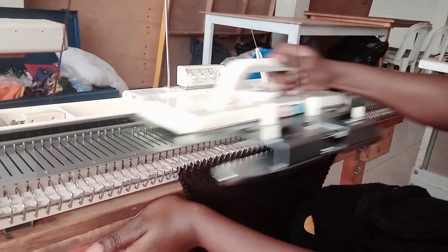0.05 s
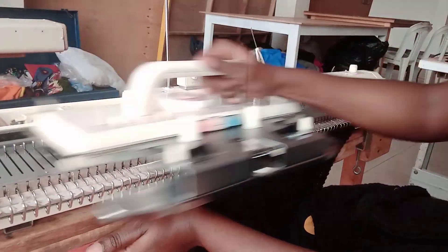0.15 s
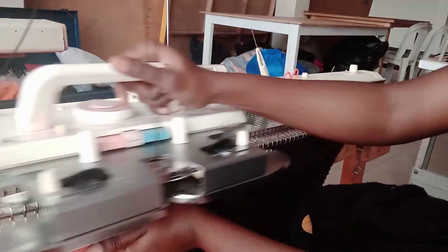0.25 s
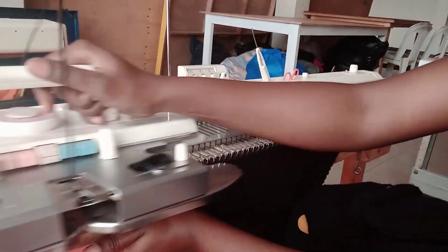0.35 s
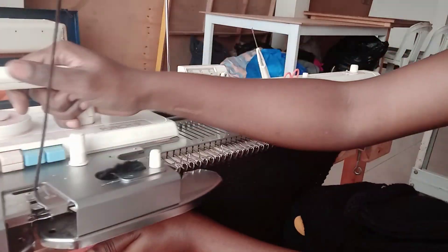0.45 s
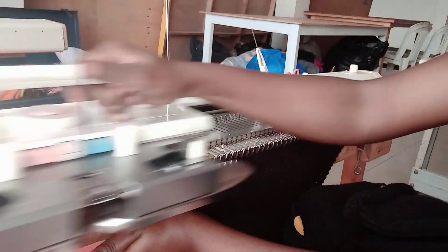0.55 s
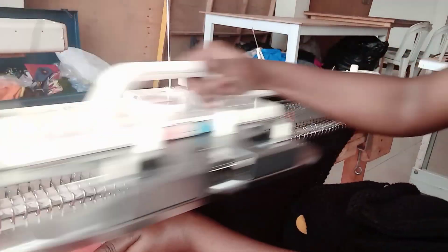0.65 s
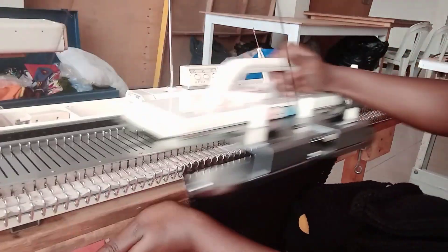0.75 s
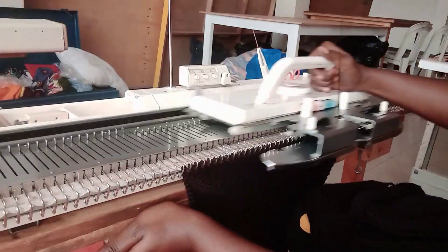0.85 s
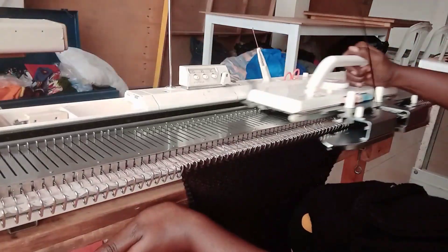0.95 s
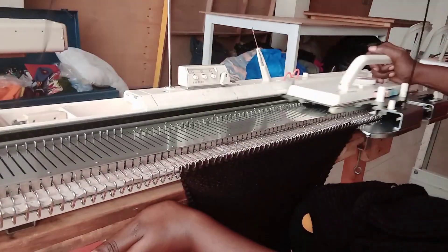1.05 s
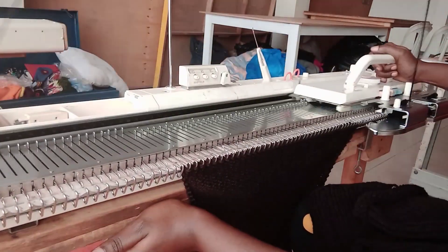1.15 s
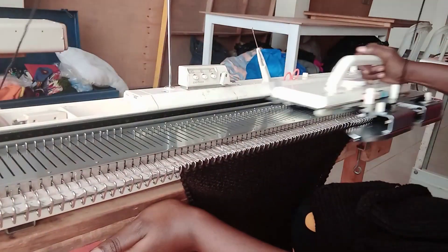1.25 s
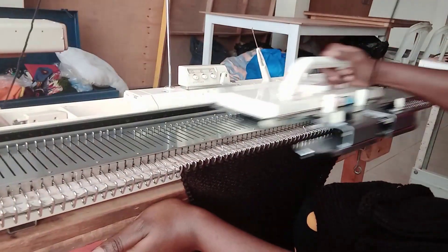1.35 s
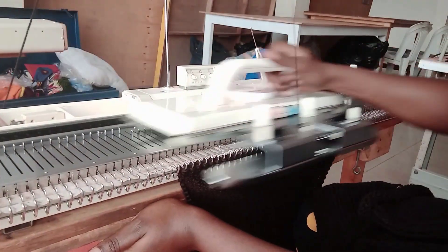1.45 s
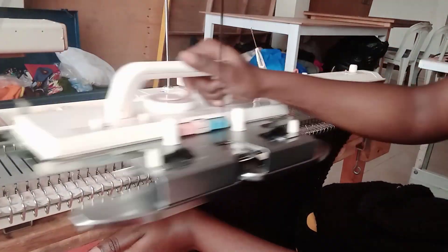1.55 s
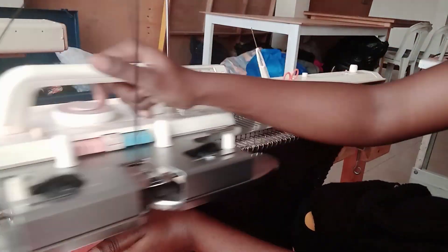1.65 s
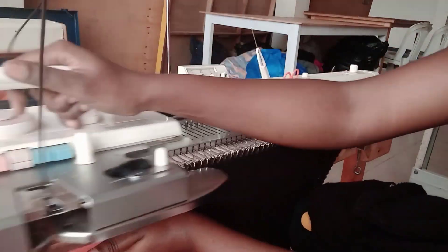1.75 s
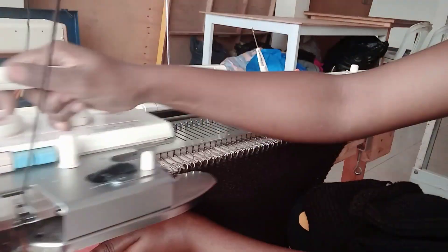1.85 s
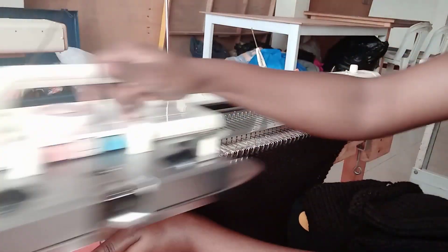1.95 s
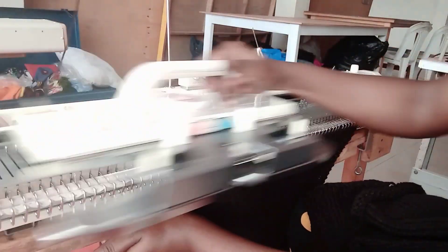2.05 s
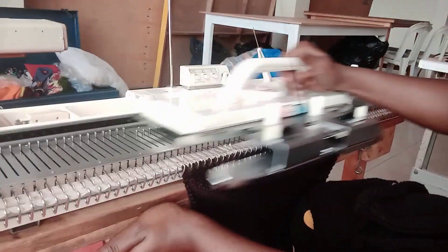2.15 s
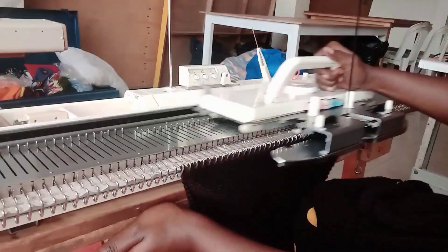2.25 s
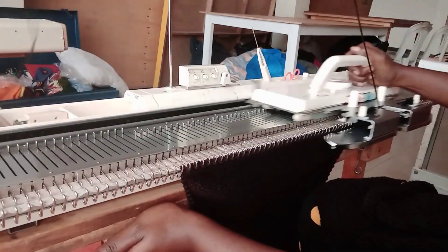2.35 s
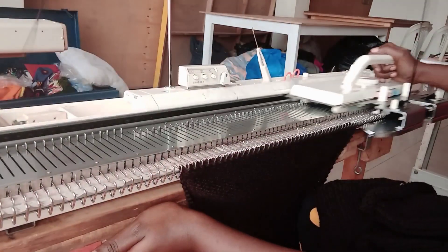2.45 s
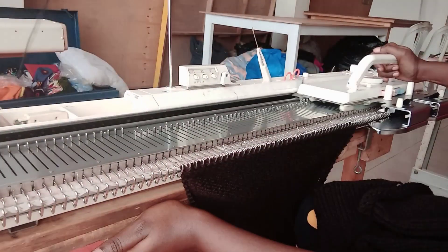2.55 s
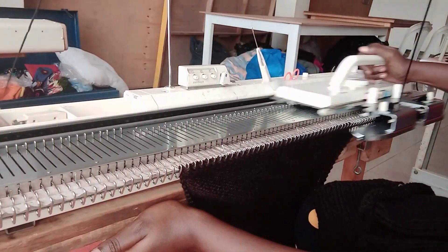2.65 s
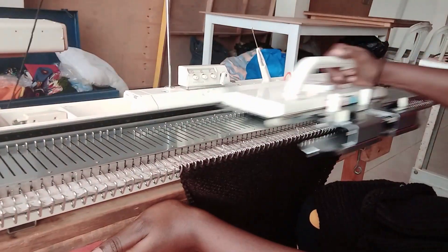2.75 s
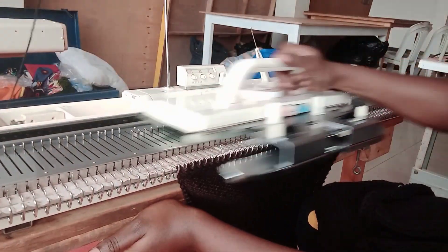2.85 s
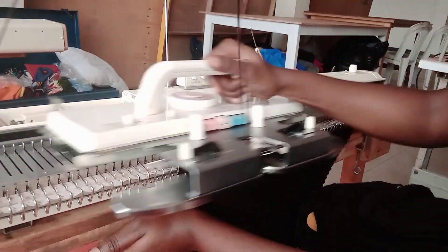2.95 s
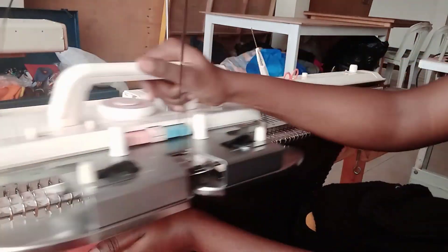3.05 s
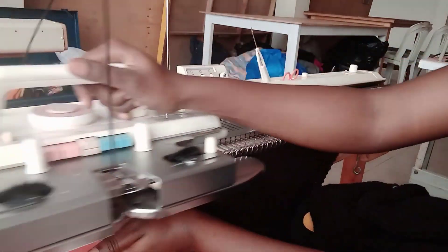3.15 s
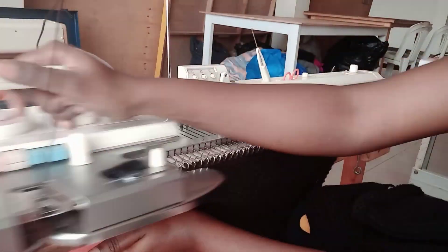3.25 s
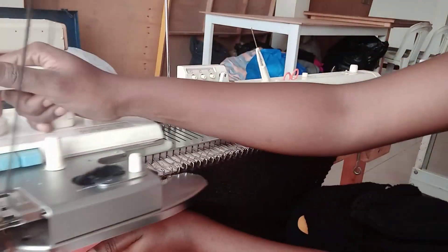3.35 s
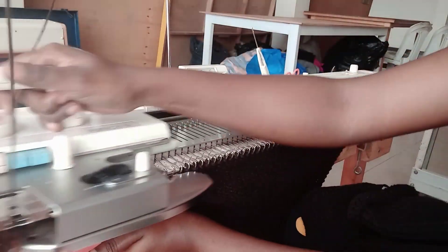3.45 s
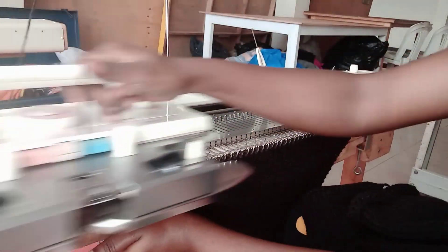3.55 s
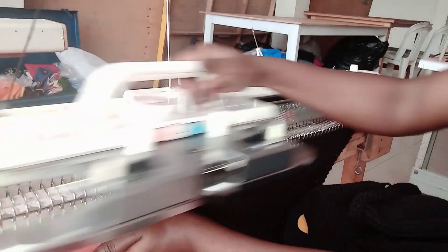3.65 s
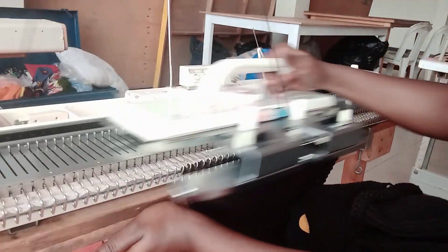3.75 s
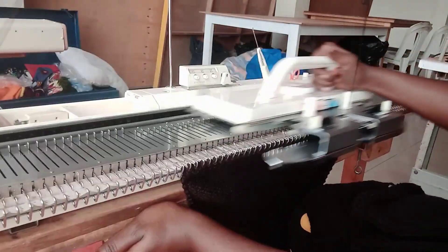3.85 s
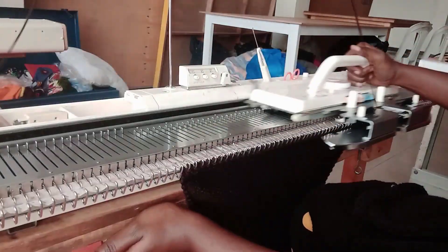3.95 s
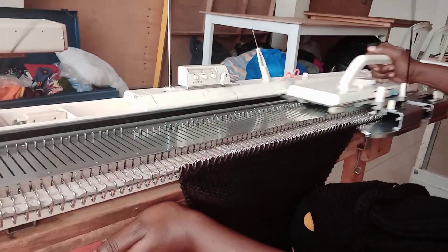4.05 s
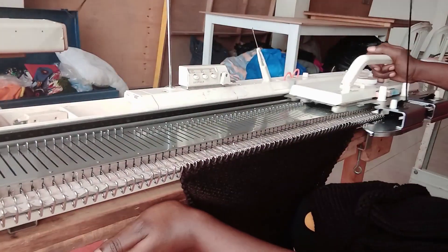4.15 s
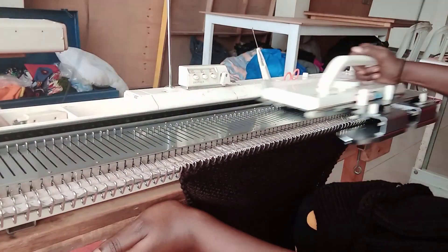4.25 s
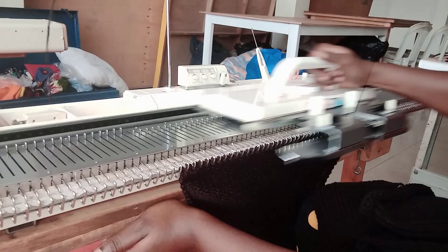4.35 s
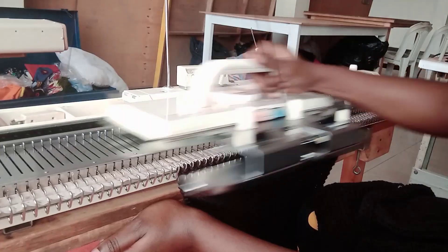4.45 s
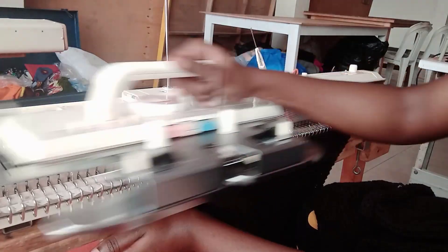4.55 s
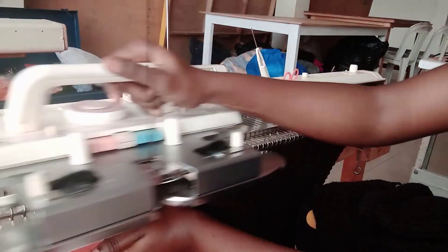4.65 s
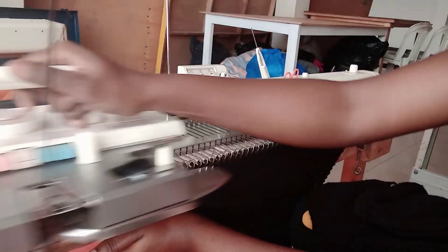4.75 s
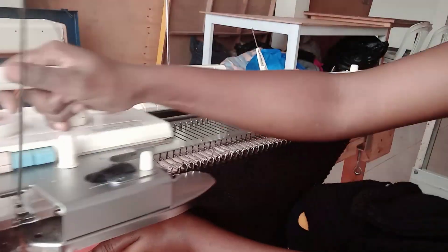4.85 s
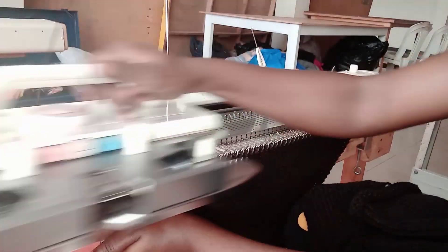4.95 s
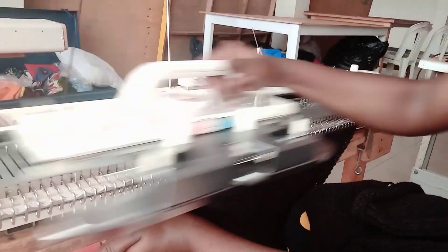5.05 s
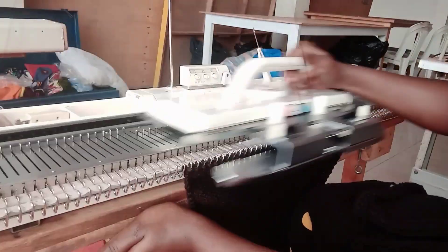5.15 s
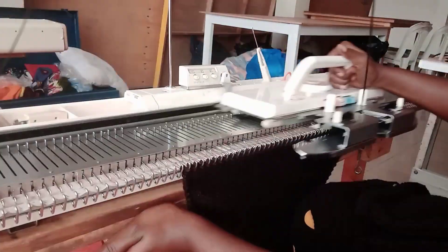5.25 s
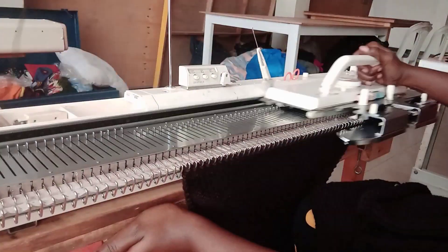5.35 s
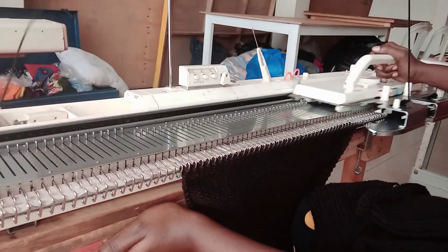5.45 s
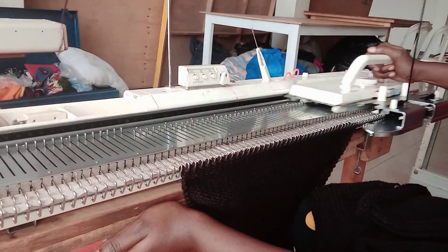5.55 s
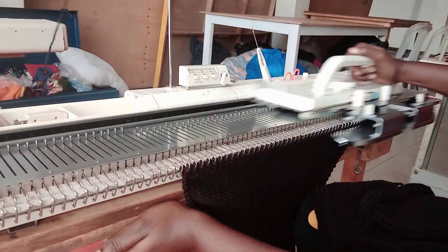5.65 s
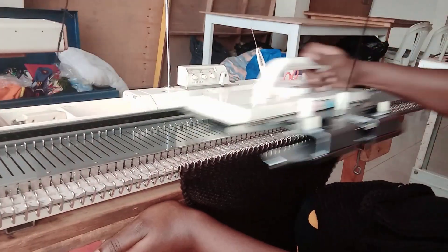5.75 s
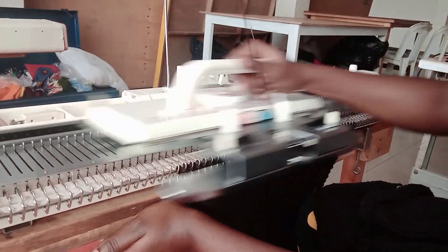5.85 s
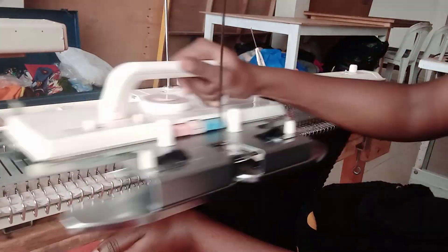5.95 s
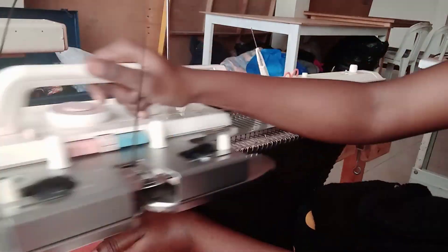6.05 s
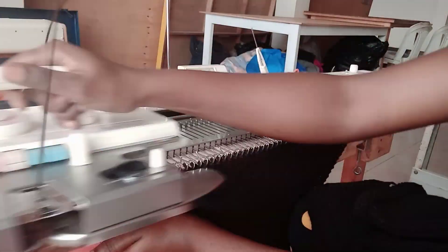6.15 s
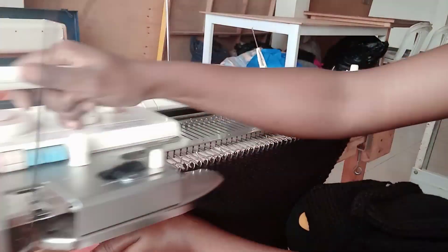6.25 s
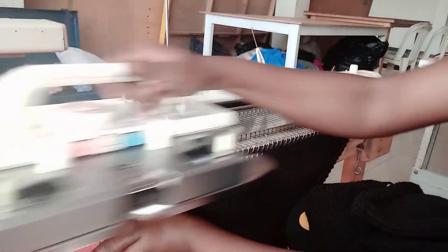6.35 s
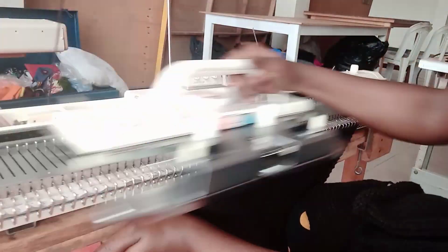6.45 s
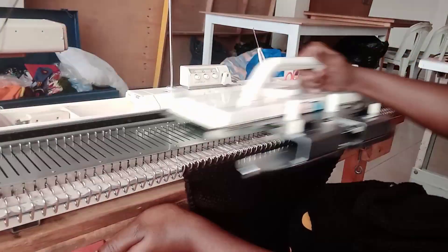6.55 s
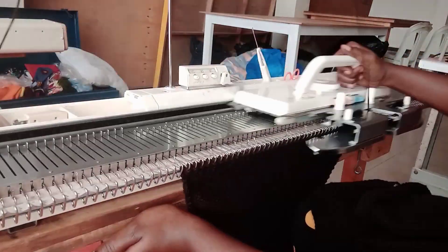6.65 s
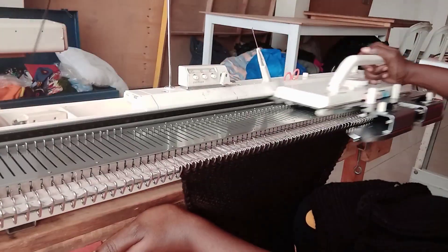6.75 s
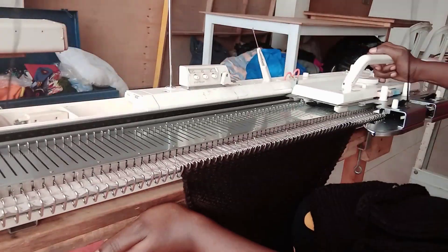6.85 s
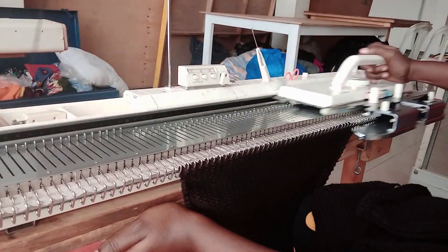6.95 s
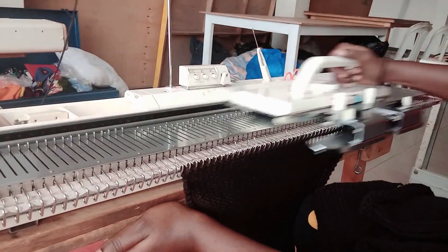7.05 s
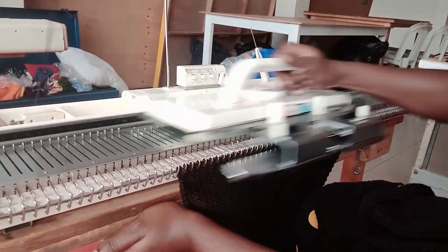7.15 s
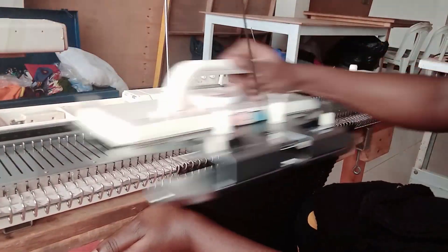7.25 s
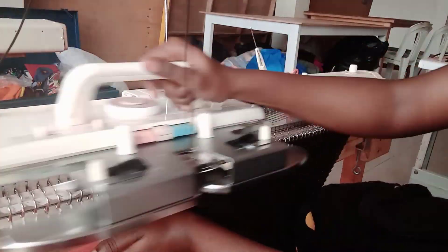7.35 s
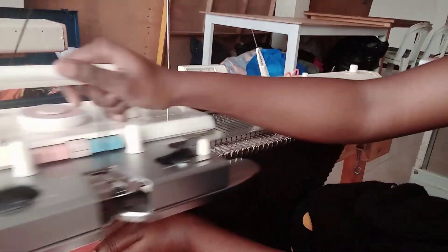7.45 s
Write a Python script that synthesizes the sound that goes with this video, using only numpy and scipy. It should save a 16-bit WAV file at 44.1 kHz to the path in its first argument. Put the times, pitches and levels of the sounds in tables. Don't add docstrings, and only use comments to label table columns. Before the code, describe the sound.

A knitting carriage is already rattling over its steel needle bed at the start, heard close in mono in a bare, ringing room. Strokes begin near 0, 0.6, 1.3, 2.0, 2.7, 3.6, 4.3, 5.0, 5.7, 6.4 and 7.05 seconds, each lasting about 0.4 seconds. Each starts with a faint latch crackle and a dull thud, bursts into dense, bright, grinding metal clatter, then weakens as the push slows. Underneath, a buzzing hum around 165 hertz with overtones sags in pitch, and the table rumbles softly at braking. Sharp clacks end strokes around 1.0, 1.7, 2.4, 3.15 and 4.7 seconds. The longest pause, about 3.2 to 3.55 seconds, holds small scattered ticks. A very faint, thin, high squeak comes near 4.0 seconds. A strong catch sounds at 5.7, and a last tick near 7.45. Quiet room air persists beneath.

```python
import sys
import numpy as np
from scipy import signal
from scipy.fft import rfft, irfft
from scipy.io import wavfile
from scipy.ndimage import uniform_filter1d

SR = 44100
rng = np.random.default_rng(int(sys.argv[2]) if len(sys.argv) > 2 else 0)


def undo_db(level):
    steps = np.asarray(level, float) / 20
    return 10 ** steps


def to_wav(sig):
    pcm = np.clip(np.atleast_2d(sig), -1, 1) * 32767
    pcm = np.round(pcm).astype(np.int16)
    wavfile.write(sys.argv[1], SR, pcm.T)


N = 330309
T = np.arange(N) / SR

# start [s], slack before the cams bite [s], end of the needles after the start [s],
# top needle rate [needles per s], time from the start to that rate [s].
STROKES = [(-.085, .012, 0.42, 164, .1), (.601, .019, .423, 170, .124), (1.308, .011, .404, 168, .164),
           (1.988, 0.013, 0.42, 169, 0.12), (2.725, 0.0077, .42, 159, .14), (3.576, 0.023, 0.44, 168, .13),
           (4.299, 0.0097, 0.41, 167, .12), (4.969, .014, .434, 174, .11), (5.691, 0.0084, .398, 171, .14),
           (6.355, .011, .419, 186, .12), (7.049, 0.0081, 0.4, 163, .14)]
# catch tick [dB], dull body against the tick [dB], table shudder at braking [dB].
TURNS = [(-30, 0, -48), (-40, 6, -58), (-23, 0, -52), (-26, 7, -58), (-32, 4, -60), (-36, 5, -58),
         (-22, 3, -63), (-22, 11, -62), (-13, -6, -57), (-24, 10, -54), (-19, -2, -55)]
# frequency [Hz], level [dB per Hz].
STEEL_COLOUR = [(100, -41.5), (165, -21.5), (240, -27), (430, -19.5), (720, -16.5), (1100, -10.5),
                (3300, -11.5), (4400, -9), (6650, 1), (7600, -7.5), (8800, -21), (13200, -28), (14600, -16),
                (15500, -15)]
# frequency [Hz], width [Hz], level [dB].
BED_MODES = [(327, 40, -19), (390, 10, -4), (448, 9, -12), (636, 11, -7.5), (1026, 55, -17), (2406, 99, -9),
             (3460, 600, -4.5), (4760, 200, -17)]
SPLIT_HZ = 2800, 8500
BITE_DB = -5.5


def unit(x):
    return x / np.sqrt(np.mean(x ** 2))


def noise():
    return rng.standard_normal(N)


def along(table, hz, axis=1):
    table = np.array(table)
    return np.interp(np.log(np.maximum(hz, 1)), np.log(table[:, 0]), table[:, axis])


def colour(x, table, size=4096):
    gain = undo_db(along(table, np.fft.rfftfreq(size, 1 / SR)))
    cepstrum = irfft(np.log(gain))
    cepstrum[1:size // 2] *= 2
    cepstrum[size // 2 + 1:] = 0
    return signal.fftconvolve(x, irfft(np.exp(rfft(cepstrum))))[:N]


def band(x, lo_hz, hi_hz):
    return signal.sosfilt(signal.butter(3, [lo_hz, hi_hz], "bandpass", fs=SR, output="sos"), x)


def resonate(x, hz, width_hz):
    return signal.lfilter(*signal.iirpeak(hz, hz / width_hz, SR), x)


def die_away(x, decay_s):
    return signal.lfilter([1], [1, -np.exp(-1 / (decay_s * SR))], x)


def bursts(times, sizes, decay_s):
    x = np.zeros(N)
    np.add.at(x, np.clip((times * SR).astype(int), 0, N - 1), sizes)
    return die_away(x, decay_s)


def ramp(t, length_s):
    return np.clip(t / np.maximum(length_s, 1e-3), 0, 1)


def stroke():
    # rattle [dB], tiring by the last needle [dB], run-out [s],
    # shape of the slowing [exponent], hum [dB].
    arm_strokes = [(-13, -8, .055, 1.3, 1), (-13.5, -6.5, .04, 1.75, 1.5), (-13.5, -7, 0.068, 1.1, 0),
                   (-13.5, -5.5, .05, 1.25, 1), (-13.5, -6, .085, 1.3, -1.5), (-13.5, -4.5, 0.047, 1.1, 0),
                   (-13.5, -7, 0.053, 1.5, 1), (-13, -8.5, 0.038, 1.2, 0.5),
                   (-13.5, -6.5, 0.049, 1.5, -0.5), (-13, -7.5, 0.058, 1.0, 0.5),
                   (-13, -8.5, 0.066, 1.6, 0)]
    slack_db, run_out_db = -17.5, -18.5
    bite_s, fill_s = 0.015, 0.042
    tire_share = 0.63
    start_speed, end_speed = .84, .64

    rows = np.c_[STROKES, arm_strokes]
    current = np.maximum(np.searchsorted(rows[:, 0], T) - 1, 0)
    start, slack, last, top_hz, top_s, full_db, tired_db, out_s, ease, hum_db = rows[current].T
    t = T - start

    bite = ramp(t - slack, bite_s)
    fill = ramp(t - slack - bite_s, fill_s)
    bite_db = slack_db * (1 - bite) + BITE_DB * bite * (1 - fill)
    tire_db = tired_db * ramp(t - tire_share * last, (1 - tire_share) * last)
    out_db = run_out_db * ramp(t - last, out_s)

    getting_going = (1 - start_speed) * (1 - ramp(t, top_s))
    slowing = (1 - end_speed) * np.clip((t - top_s) / (last - top_s), 0, 1.2) ** ease
    needle_hz = uniform_filter1d(top_hz * (1 - getting_going - slowing), size=900)
    moving = uniform_filter1d(1. * (t <= last + out_s), size=90)
    return moving, full_db, bite_db, tire_db, out_db, hum_db, needle_hz


def flare():
    span = int(.045 * SR)
    return 0.97 * unit(uniform_filter1d(uniform_filter1d(noise(), span), span))


def cams(turns, spread_db, decay_s, rub, count):
    needle = np.arange(int(turns[-1]))[:, None] + rng.random(count)
    chance = rng.standard_normal((2, 1500, count))[:, :len(needle)]
    times = np.interp(needle + .35 * chance[0], turns, T)
    blows = bursts(times.ravel(), undo_db(spread_db * chance[1]).ravel(), decay_s)
    return unit((unit(blows) + rub) * noise())


def patchy(x, depth_db):
    z = signal.stft(x, nperseg=512)[2]
    field = uniform_filter1d(rng.standard_normal(z.shape), size=7, axis=0)
    field = uniform_filter1d(field, size=6, axis=1)
    return signal.istft(z * undo_db(depth_db * unit(field)), nperseg=512)[1][:N]


def table_hum(moving, turns, arm_db, bite_db, tire_db, out_db):
    # frequency [Hz], gain [dB].
    table_gain = [(90, -16), (130, -9), (150, 2.5), (185, 2.5), (250, -4), (400, -.4), (700, -2)]
    multiple_db, follows_tiring = [-51, -51.5, -49.5], [2.4, 1.3, .9]
    rock_db = [1.6, 2.8, 2.8, 3.0]
    ring_db = 1.5

    shared_db = arm_db + 1.8 * bite_db + 0.45 * out_db
    levels_db = [db + shared_db + share * tire_db for db, share in zip(multiple_db, follows_tiring)]
    levels_db.append(levels_db[-1] - 8)

    rock = uniform_filter1d(rng.standard_normal((len(levels_db), N)), size=1200)
    hum = np.zeros(N)
    for k, db in enumerate(levels_db):
        level = undo_db(db + 4.5 + rock_db[k] * unit(rock[k]))
        hum += level * np.sin(2 * np.pi * (k + 1) * turns)
    hum = colour(moving * hum, table_gain)
    ringing = sum(resonate(hum, hz, width + 8) for hz, width, _ in BED_MODES[:4])
    return hum + undo_db(ring_db) * ringing


def carriage():
    moving, full_db, bite_db, tire_db, out_db, arm_db, needle_hz = stroke()
    turns = np.cumsum(needle_hz) / SR

    rattle_db = full_db + bite_db + tire_db + out_db
    fizz_db = -13 - 0.16 * bite_db - 0.067 * tire_db + 0.67 * out_db
    bitten_db = np.maximum(bite_db, BITE_DB)
    slack_db = np.minimum(bite_db - BITE_DB, 0)
    knock_db = -13 - 0.36 * bitten_db + .35 * slack_db - 0.5 * tire_db - .15 * out_db

    butts = cams(turns, spread_db=4.5, decay_s=.0002, rub=1.9, count=10)
    latches = cams(turns, spread_db=4, decay_s=.0006, rub=1.3, count=7)
    sinkers = cams(turns, spread_db=3, decay_s=.001, rub=1.6, count=6)
    blows = .5 * butts + sinkers
    ringing = sum(undo_db(db) * resonate(blows, hz, width) for hz, width, db in BED_MODES)

    steel = patchy(colour(butts + ringing, STEEL_COLOUR), depth_db=1.3)
    bed = patchy(colour(blows + ringing, STEEL_COLOUR), depth_db=1.7)
    light = patchy(colour(0.97 * butts + latches, STEEL_COLOUR), depth_db=1.7)
    rattle = unit(band(steel, *SPLIT_HZ)) * undo_db(0.65 * flare())
    knock = unit(band(bed, 674, SPLIT_HZ[0])) * undo_db(knock_db + 0.74 + flare())
    fizz = unit(band(light, SPLIT_HZ[1], 19100)) * undo_db(fizz_db + 5.0)

    shake = die_away(moving * undo_db(rattle_db + knock_db), 0.034) / (0.033 * SR)
    body = shake * unit(band(bed, 261, 693)) * undo_db(-11.0)
    frame = shake * unit(band(bed, 165, 265)) * undo_db(-29 - 1.1 * tire_db)

    clatter = moving * undo_db(rattle_db) * (rattle + knock + fizz) + body + frame
    return clatter, table_hum(moving, turns, arm_db, bite_db, tire_db, out_db)


def rumble():
    push_db, push_s, shudder_s, still_db = -63.5, .12, 0.073, -70

    def bump(s):
        return np.exp(-.5 * ((T - s) / shudder_s) ** 2)

    level = undo_db(still_db)
    for (start, _, last, _, _), (_, _, brake_db) in zip(STROKES, TURNS):
        level = level + undo_db(push_db) * bump(start + push_s) + undo_db(brake_db) * bump(start + last)
    return level * unit(band(band(noise(), 71, 130), 57, 150))


def still_air():
    # frequency [Hz], level [dB per Hz].
    air_colour = [(30, -20), (60, -17), (100, -3), (250, -12), (1000, -25), (6500, -30), (9000, -52),
                  (13000, -50), (15500, -37)]
    return undo_db(-71.5) * unit(colour(noise(), air_colour))


def room(x, gap_s=.008):
    # frequency [Hz], decay by 60 dB [s], level [dB].
    room_decay = [(80, 0.86, 4.5), (520, 0.66, -2.5), (1100, 1.6, -6.5), (3100, 2.17, -10.5),
                  (6600, 1.06, -11.5), (8600, 0.92, -15), (12000, 0.28, -10), (15525, 0.33, -13)]
    hz, t, z = signal.stft(rng.standard_normal(2 * SR), SR, nperseg=512)
    fall = undo_db(-60 * t / np.maximum(along(room_decay, hz), .05)[:, None])
    energy = np.sum(np.abs(z * fall) ** 2, axis=1, keepdims=True) / np.mean(np.abs(z) ** 2) * 256
    share = undo_db(along(room_decay, hz, axis=2))[:, None] / np.sqrt(energy)
    tail = signal.istft(z * share * fall, SR, nperseg=512)[1]
    return signal.fftconvolve(x, np.r_[np.zeros(int(gap_s * SR)), tail])[:N]


def creep():
    creep_s, creep_db = .04, -49
    starts = np.array(STROKES)[1:, 0]
    chance = rng.standard_normal((len(starts), 14, 2))
    early = np.abs(chance[..., 0])
    times = starts[:, None] - creep_s * early / 2
    sizes = undo_db(creep_db + 4.5 * chance[..., 1] - 7.0 * early)
    crackle = bursts(times.ravel(), sizes.ravel(), 0.0048)
    return crackle * unit(band(colour(noise(), STEEL_COLOUR), 4000, 20000))


def ticks():
    # time [s], peak [dB], dull body against the tick [dB].
    lone_ticks = [(0.5707, -43, 6), (1.0164, -19, 4), (1.2494, -44.5, 11), (1.2672, -40, 8),
                  (1.7024, -14, 6), (1.962, -39, 8), (2.4, -12, 3), (2.6461, -47, 6), (2.6837, -50, 6),
                  (3.1491, -16, 13), (3.1712, -13, 7), (3.2174, -37, 7), (3.2415, -46, 6), (3.267, -44, 25),
                  (3.3085, -58, 1), (3.3305, -48, 3), (3.5175, -52, 6), (3.535, -48, 6), (3.5606, -51, 14),
                  (3.6033, -18, 12.5), (4.2904, -32, 8), (4.6918, -16, 6), (4.9056, -37, 3),
                  (5.65, -35, 12), (7.015, -40, 6), (7.449, -20, 2)]
    bright = unit(band(colour(noise(), STEEL_COLOUR), SPLIT_HZ[1], 22000))
    dull = unit(band(colour(noise(), STEEL_COLOUR), 550, SPLIT_HZ[1]))
    catches = [(row[0], *turn[:2]) for row, turn in zip(STROKES, TURNS) if row[0] > 0]
    fade = np.exp(-T[:SR // 40] / 0.0033)
    out = np.zeros(N)
    for s, peak_db, body_db in list(lone_ticks) + catches:
        span = slice(int(s * SR), int(s * SR) + len(fade))
        out[span] += undo_db(peak_db - 10) * fade * (bright[span] + undo_db(body_db) * dull[span])
    return out


def thuds():
    thud_db = np.array([-50, -37])
    rows = np.array(STROKES)[1:]
    sizes = undo_db(thud_db[np.arange(1, len(STROKES)) % 2])
    envelope = uniform_filter1d(bursts(rows[:, 0] + rows[:, 1], sizes, .022), size=130)
    return envelope * unit(band(noise(), 290, 720))


def squeak():
    # frequency [Hz], level [dB].
    squeak_line = [(12624, -57)]
    start_s, stop_s = 4.005, 4.095
    on = uniform_filter1d(1. * ((T > start_s) & (T < stop_s)), size=400)
    hz, db = squeak_line[0]
    return on * undo_db(db + 3) * np.sin(2 * np.pi * np.cumsum(hz + 60 * flare()) / SR)


def scene():
    clatter, hum = carriage()
    direct = clatter + ticks() + creep() + thuds()
    mono = direct + hum + rumble() + still_air()
    mono = mono + room(direct + .35 * hum) + squeak()
    return np.array([mono, mono])


def top_cut(x):
    return signal.sosfilt(signal.butter(12, 16180, fs=SR, output="sos"), x)


def record(dry):
    soft = np.tanh(1.3 * dry) / 1.28
    soft = signal.sosfilt(signal.butter(2, 44, "highpass", fs=SR, output="sos"), soft)
    cut = signal.sosfilt(signal.ellip(14, .2, 90, 15500, fs=SR, output="sos"), soft)
    return top_cut(cut)


dry = scene()
out = record(dry)
to_wav(out)
```